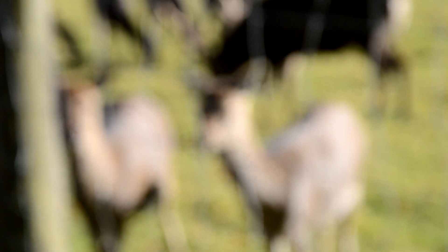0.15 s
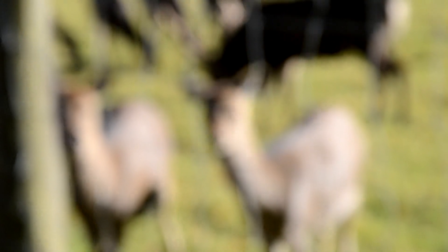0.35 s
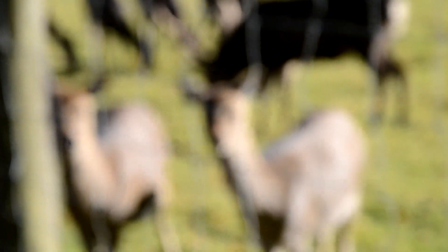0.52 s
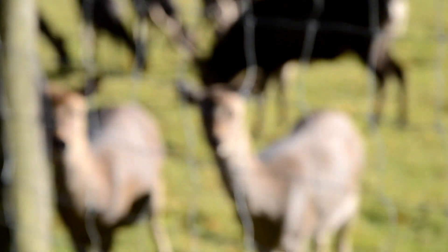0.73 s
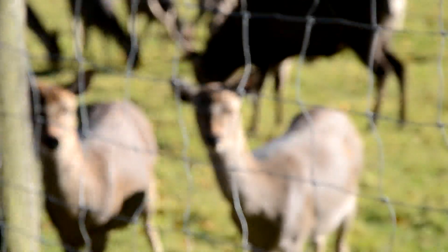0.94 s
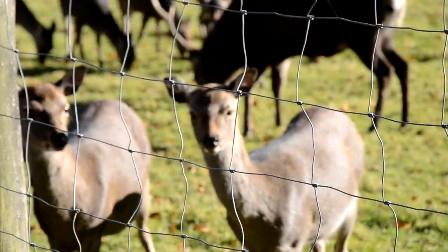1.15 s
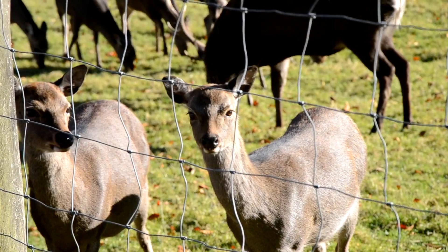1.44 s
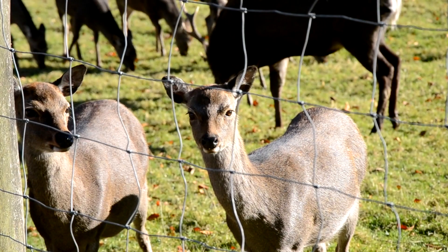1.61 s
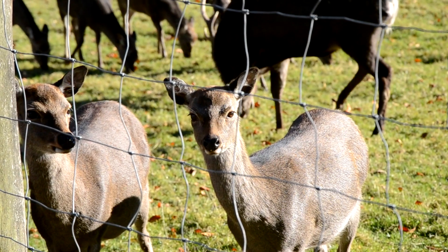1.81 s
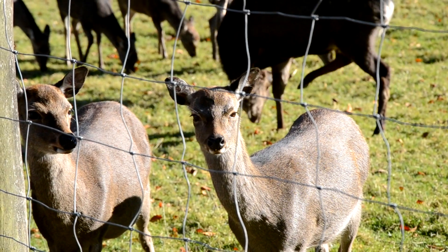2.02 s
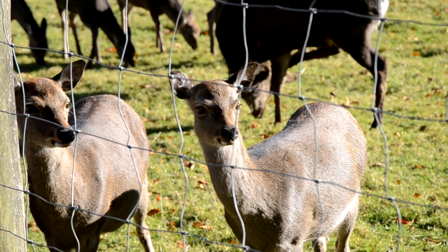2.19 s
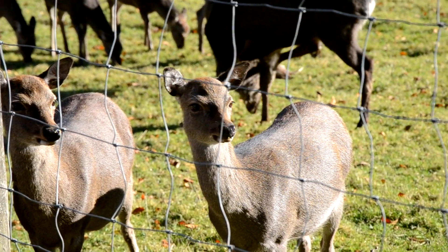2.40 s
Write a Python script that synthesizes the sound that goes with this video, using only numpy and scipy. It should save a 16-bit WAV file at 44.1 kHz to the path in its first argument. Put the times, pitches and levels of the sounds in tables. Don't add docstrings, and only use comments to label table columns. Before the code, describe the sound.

Close, dry mechanical chatter from an autofocus lens outdoors: short buzzy ticks, a rapid run of clacks with faint gear whir, a gap, a shorter run, isolated clicks, then quiet air hiss with light taps on the camera body.

```python
import sys
import numpy as np
from scipy import signal
from scipy.fft import rfft, irfft
from scipy.io import wavfile
from scipy.ndimage import uniform_filter1d

SR = 44100
rng = np.random.default_rng(int(sys.argv[2]) if len(sys.argv) > 2 else 0)


def makeup_ratio(level_db):
    decades = np.asarray(level_db, float) / 20
    return 10 ** decades


def bounce(signal):
    frames = np.transpose(np.atleast_2d(signal))
    limited = np.clip(frames, -1, 1)
    pcm = np.round(limited * 32767).astype(np.int16)
    wavfile.write(sys.argv[1], SR, pcm)


N = 112454

# (frequency [Hz], level [dB])
AIR_SPECTRUM = [(15, -58), (25, -31), (58, -12.5), (394, -10.5), (523, -11), (1070, -4.5), (4320, -16.5),
                (9120, -36.5), (11800, -37), (15300, -89), (22000, -120)]
# (time [s], level [dB])
WHIR_LEVEL = [(.165, -80), (.18, -57), (.4, -52), (.47, -53), (.5, -52), (.9, -54), (1.0, -56), (1.2, -54),
              (1.3, -54), (1.42, -57), (1.68, -62), (1.72, -80)]
# (frequency [Hz], level [dB])
GRIT_SPECTRUM = [(240, -71), (400, -10.5), (2250, 0.5), (2520, 6), (3640, 2.5), (4570, 0.5), (5050, 2.5),
                 (10800, -21), (11800, -64), (15300, -98), (22000, -120)]
# (time [s], level [dB])
FINGER_TAPS = [
    (.1430, -36),
    (1.9882, -36),
    (2.5448, -33.5),
]
# (frequency [Hz], level [dB], time to fade 60 dB [s])
BODY_MODES = [(900, -6, .02), (1400, -1, .018), (1950, -7, .012), (2800, -8, .006), (4300, -11, .006)]
# (time [s], length [s], start frequency [Hz], end frequency [Hz], level [dB])
FAR_CHIRPS = [
    (.190, .006, 9000, 7000, -56),
    (.399, .003, 5800, 5800, -50),
    (.409, .007, 7400, 5600, -49),
    (.4235, .007, 4700, 3900, -40),
    (.438, .008, 5400, 5100, -52),
    (1.2105, .007, 3900, 4400, -41),
    (1.218, .006, 4500, 4800, -42),
]
FULL_STROKES = [(58, 1), (62, 2), (67, 2), (72, 2), (78, 2), (83, 2), (88, 2), (94, 2), (101, 2), (107, 2),
                (115, 2), (122, 2), (128, 1), (133, 2), (138, 1), (143, 2), (150, 2), (156, 2), (163, 1),
                (169, 2), (176, 1), (180, 1), (184, 1), (189, 2),
                (198, 1), (203, 1), (210, 2), (217, 2), (225, 2), (234, 2), (242, 2), (251, 2), (262, 2),
                   (270, 1), (276, 1), (284, 1),
                (306, 1), (312, 2), (318, 2), (324, 2), (331, 2), (338, 2), (345, 2), (352, 2)]
CREEP_TICKS = [(-29, 6, 4), (-22, 4, 1), (13, 7, 5), (23, 4, 1), (357, 2, 1), (371, 6, 5), (382, 4, 2),
               (429, 6, 4), (441, 3, 2)]
# (kick [dB], strongest tick [dB], fall per tick either side [dB])
CREEP_LEVELS = [(-2, -3, 3), (1.5, -5, 2), (-1, -3, 2.5), (1.5, -6, 2), (0, -8, 3), (-2, -2, 2.5),
                (1.5, -8, 1.5), (-2, -4, 2.5), (0, -6, 2)]
# (kick time [s], kick level [dB], clack time [s], clack level [dB])
TURNS = [
    (.3026, 0, .3090, -2.5),
    (1.5237, -1, 1.5322, -4),
    (1.6563, 0, 1.6645, -1),
]
# (frequency [Hz], time to fade 60 dB [s], signed height for clack [1], for kick [1])
BARREL_MODES = [(2038, .06, .003, -.004), (2500, .0064, .484, -.178), (2532, .0052, -.543, .202),
                (3663, .0131, .0575, -.0272), (3890, .057, -.0072, .0025), (4229, .02, -.0123, .0045),
                (4942, .023, -.0417, .007), (5164, .004, .088, 0), (5586, .0044, .036, -.03),
                (5848, .0062, -.06, -.022)]
# (frequency [Hz], time to fade 60 dB [s], clack [dB], kick [dB])
HOUSING_MODES = [(523, 0.044, -59, -56.5), (813, 0.078, -49.5, -52), (1400, 0.032, -47.5, -46),
                 (1744, 0.058, -47, -62), (2583, 0.09, -52, -74), (3710, 0.0083, -79, -38.5),
                 (5088, 0.016, -30, -43), (6650, 0.008, -53, -45.5), (7180, 0.013, -37.5, -38),
                 (8350, 0.012, -50, -46.5), (9130, 0.011, -43.5, -45), (10750, 0.0085, -41, -41)]
# (from [s], to [s])
DULL_MOMENTS = [(.892, .9), (1.107, 1.115), (1.392, 1.417), (1.479, 1.513), (1.545, 1.572)]

CLOCK_HZ, TICK_ZERO_S = 332.8, .3120
AIR_DB, WHIR_FLICKER_DB = -52, 2
CHIRP_ROUGHNESS = .3
CLACK_DB, KICK_DB = 0.53, 2.04
CLACK_SCATTER_DB, KICK_SCATTER_DB = .7, 1.5
CLACK_LAG_S, CLACK_RISE_S, KICK_RISE_S = .00003, .00028, .00068
RISE_CYCLES = .7
FREE_S, BRAKE_T60_S = .004, .006
REBOUND_TICKS, REBOUND_DB = 2, -9
TURN_REBOUND_S, TURN_REBOUND_DB = .0028, -7.5
TURN_THUMP_DB = -37
CREEP_JITTER_S = .00006
CREEP_TILT_DB, CREEP_DULLING_DB = 4, .8
RATTLE_DB, RATTLE_T60_S = -37.5, 0.033


def shaped_noise(points):
    hz = np.maximum(np.arange(N // 2 + 1) * SR / N, 1)
    point_hz, point_db = np.transpose(points)
    level_db = np.interp(np.log(hz), np.log(point_hz), point_db)
    noise = irfft(rfft(rng.standard_normal(N)) * makeup_ratio(level_db), N)
    return noise / noise.std()


def drift(rate_hz):
    span = int(SR / rate_hz)
    wander = uniform_filter1d(rng.standard_normal(N), size=span)
    wander = uniform_filter1d(wander, size=span)
    return wander / wander.std()


def background():
    whir_db = np.interp(np.arange(N) / SR, *np.transpose(WHIR_LEVEL))
    whir = makeup_ratio(whir_db + WHIR_FLICKER_DB * drift(130)) * shaped_noise(GRIT_SPECTRUM)
    hiss = makeup_ratio(AIR_DB + 0.3 * drift(18)) * shaped_noise(AIR_SPECTRUM)
    return hiss + whir


def strike(times, db, hz, t60, height, scatter_db, rise_s, brake_t60, tilt_db=0):
    out, span = np.zeros(N + 2000), np.arange(1800)
    chance = rng.standard_normal((len(times), 3))
    octave = np.log2(hz / 4000)
    ripple = np.sin(2 * np.pi * octave)
    for s, level_db, luck, tilt in zip(times, db, chance, tilt_db + np.zeros(len(times))):
        i = int(s * SR) + 1
        t = ((i + span) / SR - s)[:, None]
        colour_db = tilt * octave + scatter_db * (luck[0] + luck[1] * octave + luck[2] * ripple)
        swell = np.sin(np.pi / 2 * np.minimum(t / (rise_s + RISE_CYCLES / hz), 1)) ** 2
        fade_db = 60 * t / t60 + 60 * np.maximum(t - FREE_S, 0) / brake_t60
        rings = makeup_ratio(level_db + colour_db - fade_db) * swell * np.sin(2 * np.pi * hz * t)
        out[i:i + len(span)] += rings @ height
    return out[:N]


def taps():
    thumps = [(clack_s, db + TURN_THUMP_DB) for _, _, clack_s, db in TURNS]
    s, db = np.transpose(FINGER_TAPS + thumps)
    hz, mode_db, t60 = np.transpose(BODY_MODES)
    height = makeup_ratio(mode_db) * (-1.) ** np.arange(len(hz))
    return strike(s, db, hz, t60, height, KICK_SCATTER_DB, CLACK_RISE_S, np.inf)


def chirps():
    out = np.zeros(N)
    for s, length_s, start_hz, end_hz, db in FAR_CHIRPS:
        u = np.linspace(0, 1, int(length_s * SR))
        envelope = np.sqrt(np.abs(np.sin(np.pi * u)))
        pitch_hz = start_hz + (end_hz - start_hz) * u
        whistle = np.sin(2 * np.pi * np.cumsum(pitch_hz) / SR)
        i = int(s * SR)
        out[i:i + len(u)] += makeup_ratio(db) * envelope * whistle
    return out * (1 + CHIRP_ROUGHNESS * drift(1500))


def tick_time(tick):
    return TICK_ZERO_S + tick / CLOCK_HZ


def blows():
    clack_tick, lead = np.transpose(FULL_STROKES)
    kicks = [(tick_time(k), 0, 0) for k in clack_tick - lead]
    kicks += [(tick_time(k + REBOUND_TICKS), REBOUND_DB, 0) for k in clack_tick]
    for (first, count, top), (kick_db, tick_db, fall_db) in zip(CREEP_TICKS, CREEP_LEVELS):
        kicks.append((tick_time(first), kick_db, CREEP_TILT_DB))
        for k in range(1, count + 1):
            s = tick_time(first + k) + CREEP_JITTER_S * rng.standard_normal()
            kicks.append((s, tick_db - fall_db * abs(k - top), CREEP_TILT_DB - CREEP_DULLING_DB * k))
    kicks += [(s, db, CREEP_TILT_DB / 2) for s, db, _, _ in TURNS]
    clacks = [(tick_time(k) + CLACK_LAG_S, 0) for k in clack_tick]
    clacks += [(s, db) for _, _, s, db in TURNS]
    clacks += [(s + TURN_REBOUND_S, db + TURN_REBOUND_DB) for _, _, s, db in TURNS]
    return np.transpose(kicks), np.transpose(clacks)


def barrel(kicks, clacks):
    (kick_s, kick_db, tilt_db), (clack_s, clack_db) = kicks, clacks
    hz, t60, hard, light = np.transpose(BARREL_MODES)
    rings = strike(kick_s, kick_db + KICK_DB, hz, t60, light, KICK_SCATTER_DB, KICK_RISE_S,
                   BRAKE_T60_S, tilt_db)
    return rings + strike(clack_s, clack_db + CLACK_DB, hz, t60, hard, CLACK_SCATTER_DB, CLACK_RISE_S,
                          BRAKE_T60_S)


def housing(kicks, clacks):
    (kick_s, kick_db, _), (clack_s, clack_db) = kicks, clacks
    hz, t60, hard_db, light_db = np.transpose(HOUSING_MODES)
    sides = (-1.) ** np.arange(len(hz))
    light, hard = -sides * makeup_ratio(light_db), sides * makeup_ratio(hard_db)
    rings = strike(kick_s, kick_db, hz, t60, light, KICK_SCATTER_DB, KICK_RISE_S, np.inf)
    return rings + strike(clack_s, clack_db, hz, t60, hard, CLACK_SCATTER_DB, CLACK_RISE_S, np.inf)


def rattle(kicks, clacks):
    (kick_s, kick_db, _), (clack_s, clack_db) = kicks, clacks
    push = np.zeros(N)
    np.add.at(push, (np.r_[kick_s, clack_s] * SR).astype(int), makeup_ratio(np.r_[kick_db - 5, clack_db]))
    push = uniform_filter1d(push, size=31, origin=15)
    shaking = signal.lfilter([1], [1, -makeup_ratio(-60 / (RATTLE_T60_S * SR))], push)
    return makeup_ratio(RATTLE_DB) * shaking * shaped_noise(GRIT_SPECTRUM)


def motor():
    kicks, clacks = blows()
    return barrel(kicks, clacks) + housing(kicks, clacks) + rattle(kicks, clacks)


def scene():
    return (background() + taps() + chirps() + motor())[None]


def top_cut(x):
    return signal.sosfilt(signal.butter(12, 12210, fs=SR, output="sos"), x)


def record(dry):
    x = signal.sosfilt(signal.cheby2(10, 60, 12200, fs=SR, output="sos"), dry)
    low = signal.sosfiltfilt(signal.cheby2(10, 40, 8100, fs=SR, output="sos"), x)
    t = np.arange(N) / SR
    muted = sum((t > start - .002) & (t < end + .002) for start, end in DULL_MOMENTS) * 1.
    muted = uniform_filter1d(muted, size=175)
    mix = x + muted * (low - x)
    return top_cut(mix)


dry = scene()
out = record(dry)
bounce(out)
```